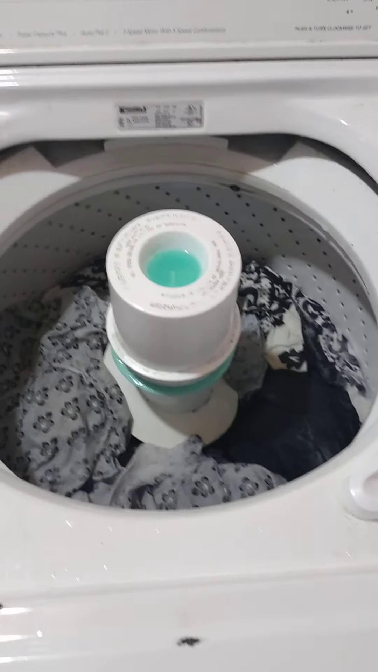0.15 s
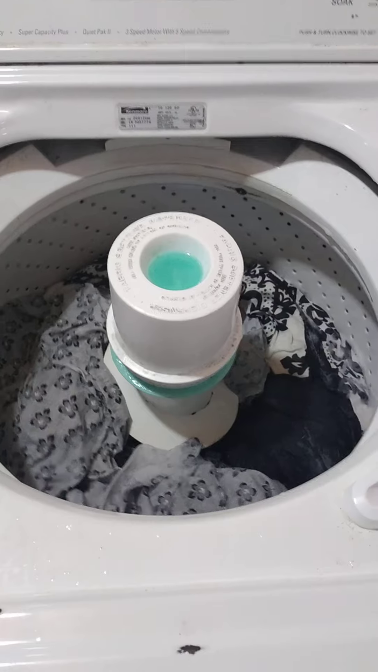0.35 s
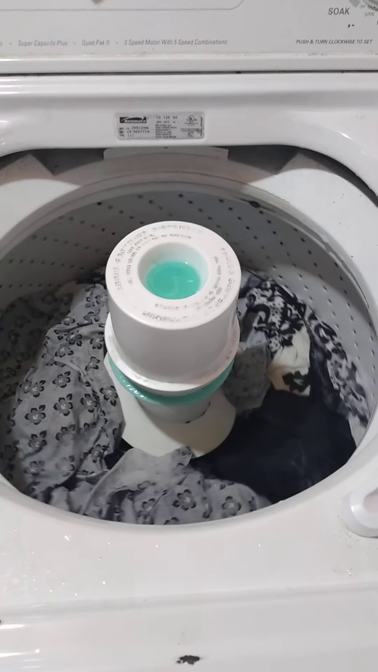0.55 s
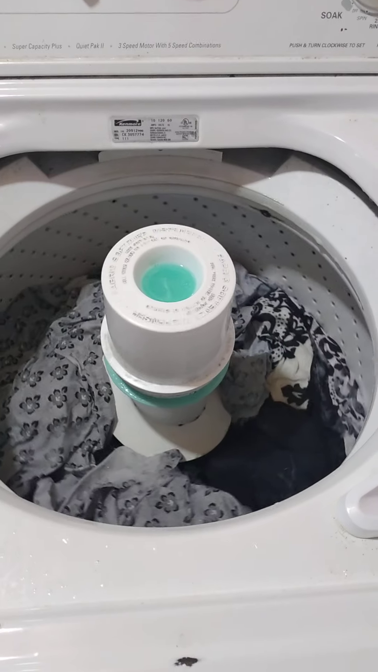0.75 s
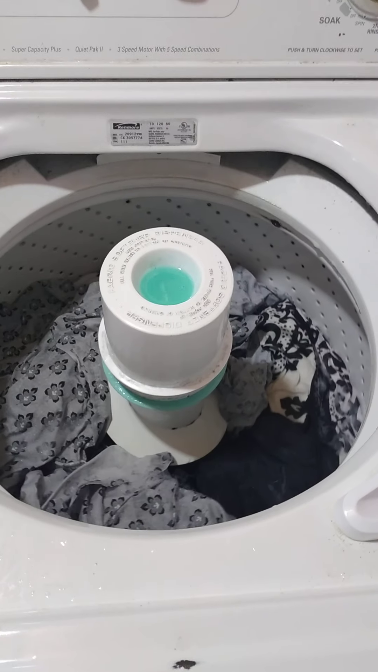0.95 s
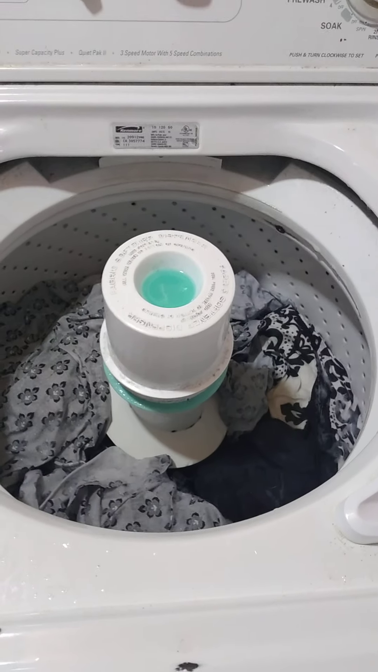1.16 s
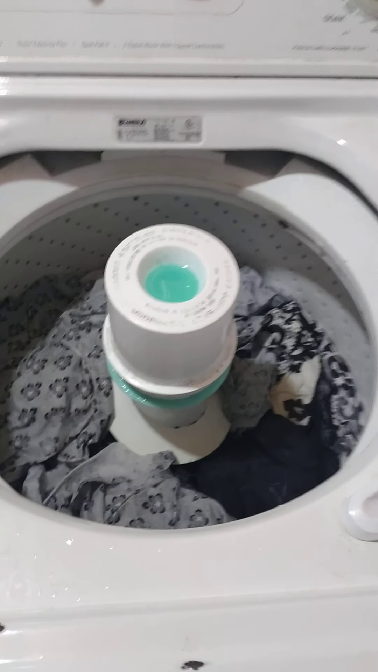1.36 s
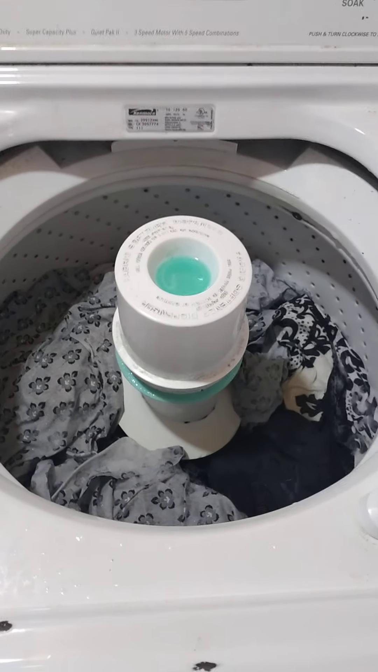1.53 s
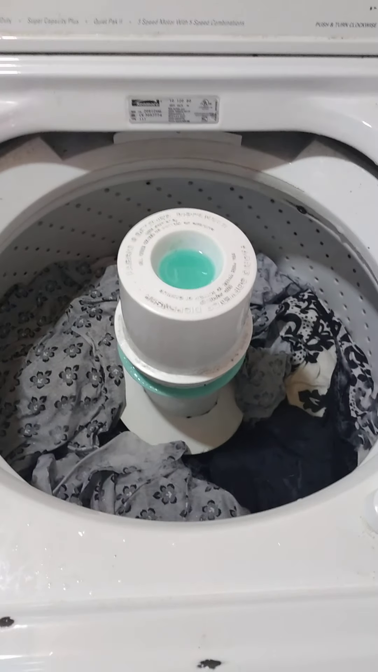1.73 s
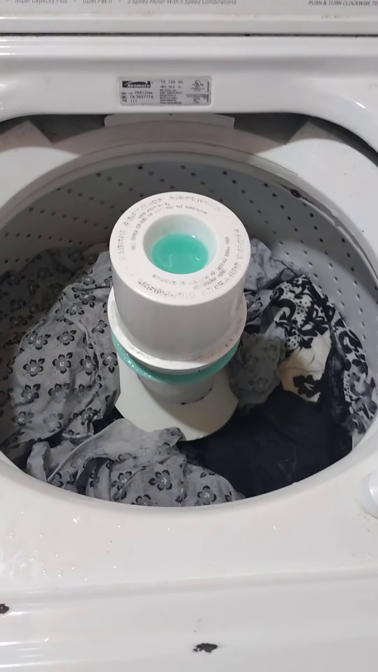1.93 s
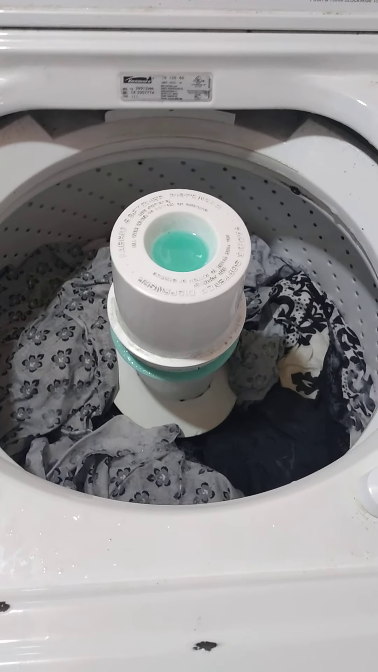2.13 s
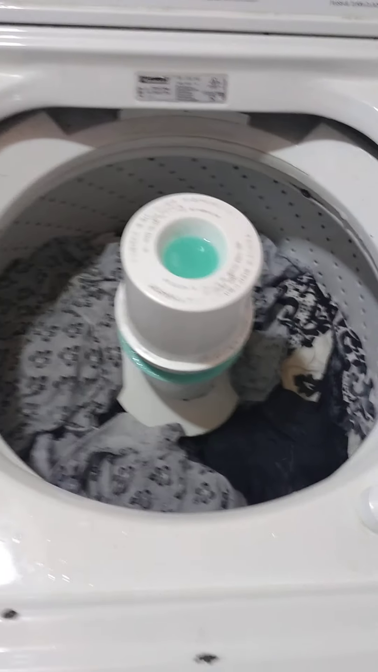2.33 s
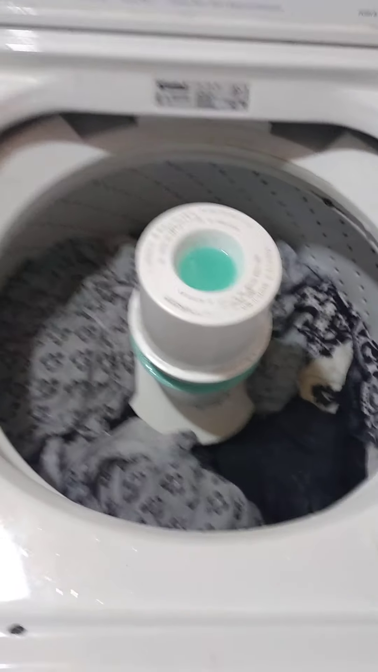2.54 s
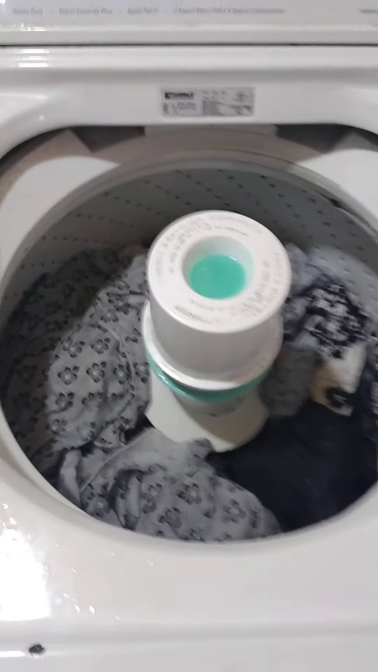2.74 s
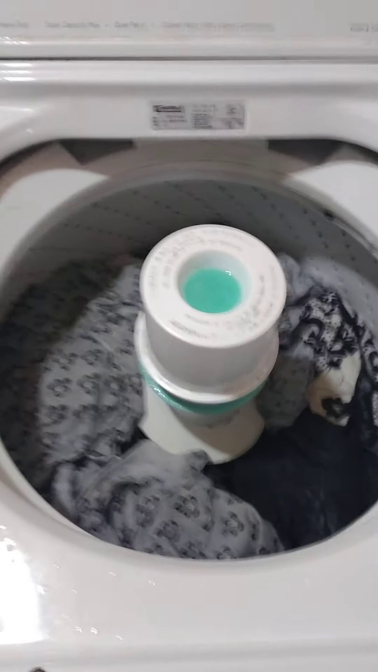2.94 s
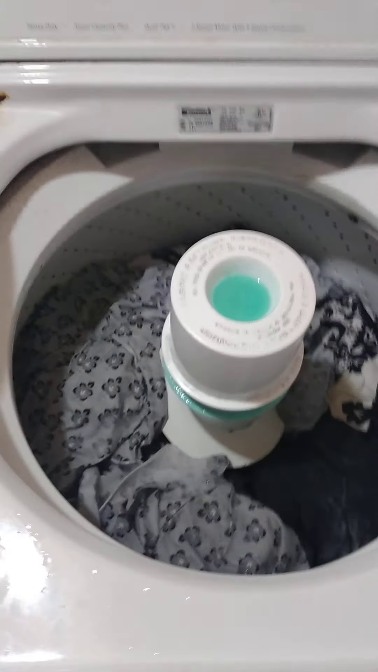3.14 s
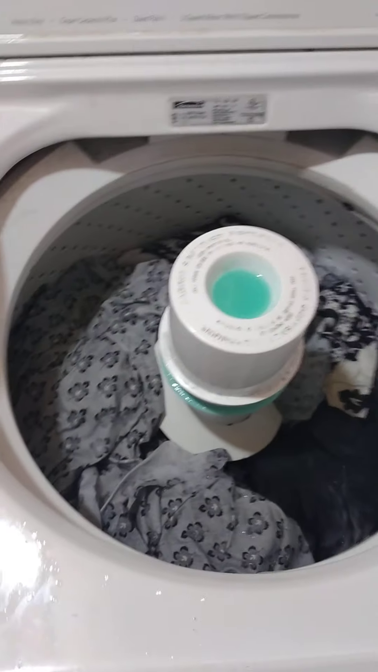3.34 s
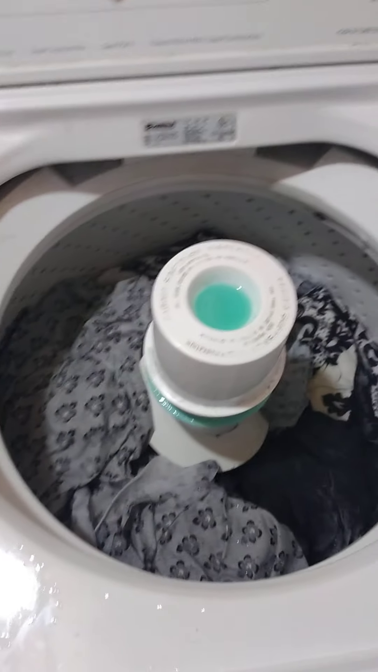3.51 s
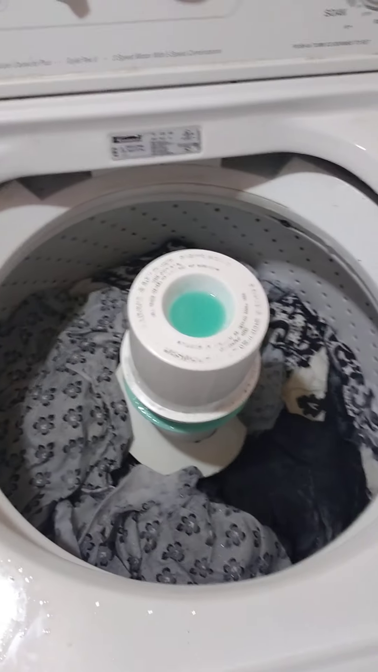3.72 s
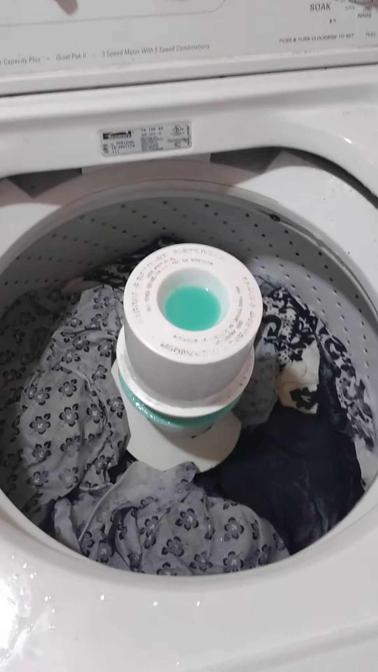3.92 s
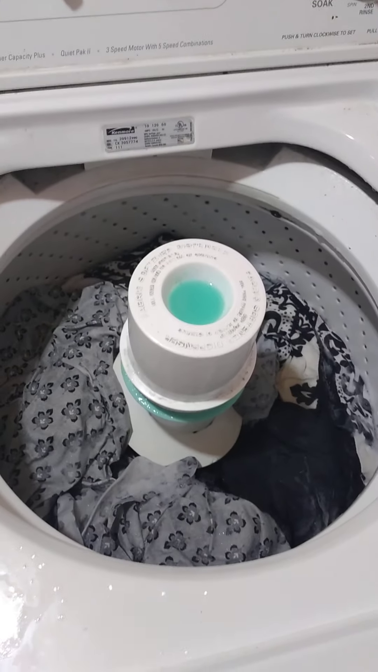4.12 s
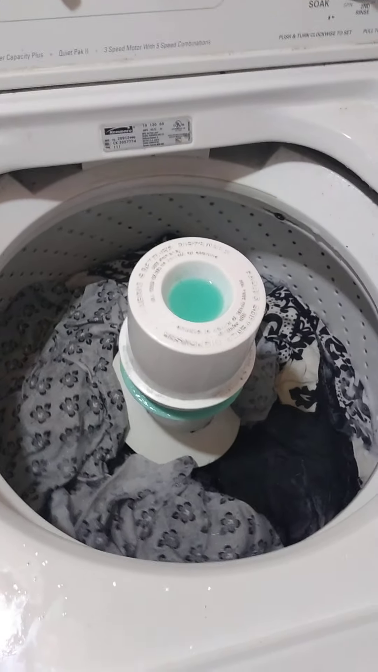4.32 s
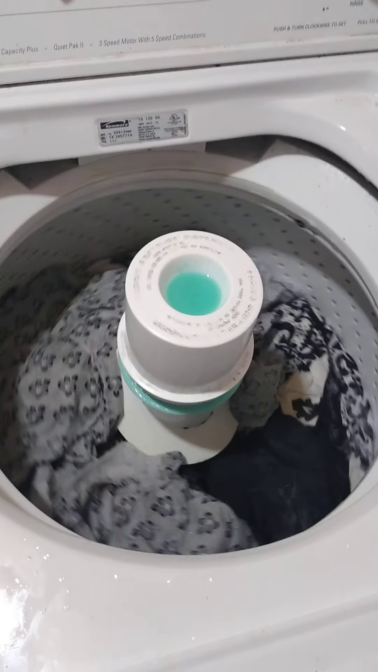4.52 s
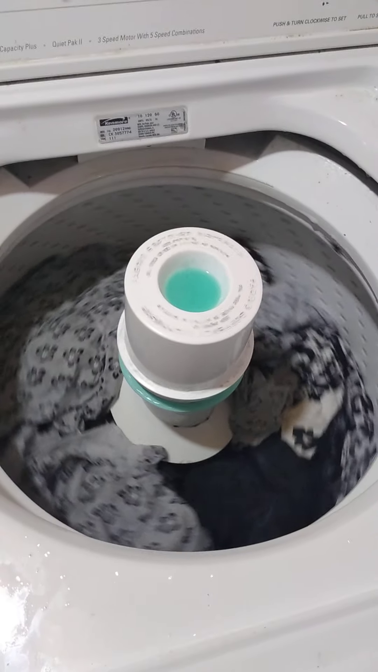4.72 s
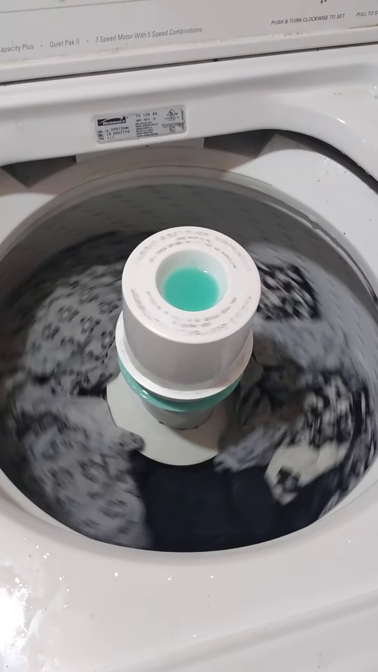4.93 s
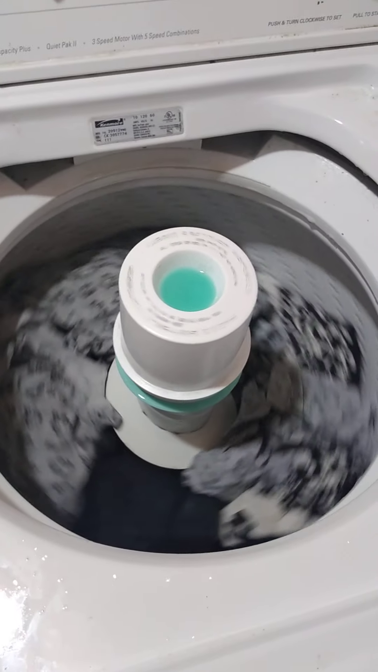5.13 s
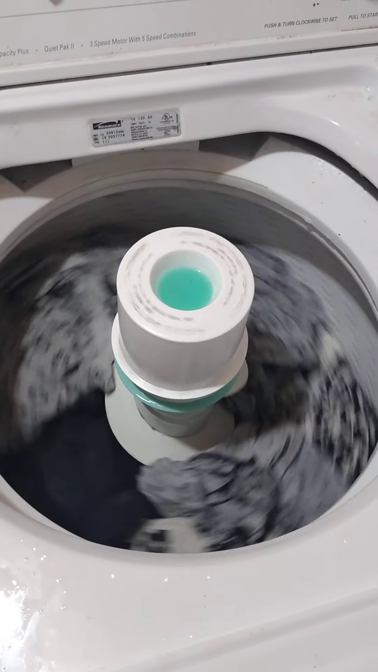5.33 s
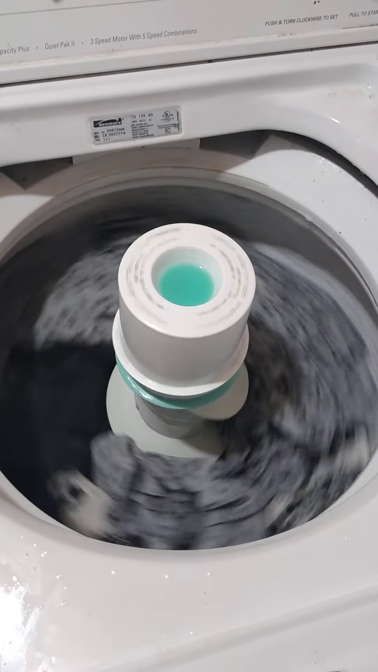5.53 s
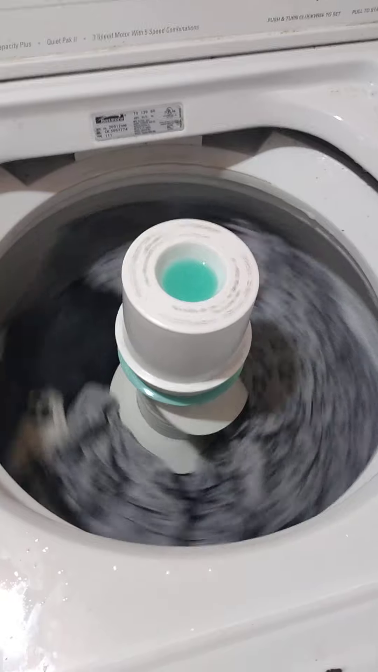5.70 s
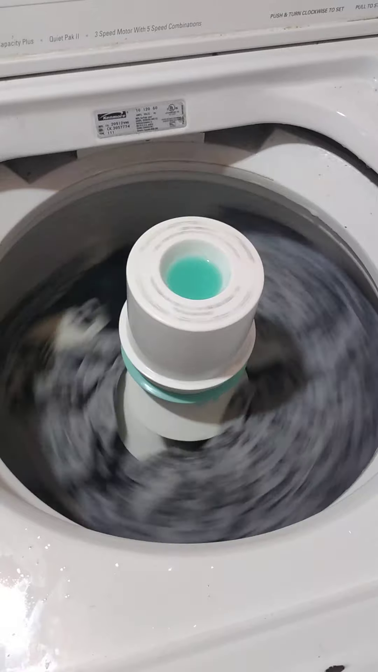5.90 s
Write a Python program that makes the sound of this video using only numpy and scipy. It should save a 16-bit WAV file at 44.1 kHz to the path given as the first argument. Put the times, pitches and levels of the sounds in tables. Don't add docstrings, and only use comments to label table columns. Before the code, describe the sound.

Loud brake clunk and smaller clack end a washer's hum, a soft fan throbs for several seconds, then the motor snaps on and spins.

```python
import sys
import numpy as np
from scipy import signal
from scipy.fft import rfft, irfft, next_fast_len
from scipy.io import wavfile
from scipy.ndimage import uniform_filter1d

SR = 44100
rng = np.random.default_rng(int(sys.argv[2]) if len(sys.argv) > 2 else 0)


def put_to_file(sound):
    columns = np.atleast_2d(sound).T
    safe = np.clip(columns, -1, 1)
    whole_steps = np.round(safe * 32767)
    wavfile.write(sys.argv[1], SR, whole_steps.astype(np.int16))


def amplitude_ratio(level_db):
    exponent = np.asarray(level_db, float) / 20
    return 10 ** exponent


N = 267378

# f/Hz, level per Hz/dB
BELT_COLOUR = [(2800, -4.5), (3500, -7), (4500, -7.5), (5500, -7.5), (6400, -10), (7200, -15),
               (8000, -10.5), (9000, -19), (10000, -21.5), (10800, -19.5), (11800, -25), (13000, -33),
               (14500, -40), (15600, -43)]
GEAR_COLOUR = [(30, 0), (45, -16), (70, -9.5), (105, -6), (190, -8.5), (270, -4), (400, -7.5), (600, -11),
               (870, -19.5), (1100, -15)]
COASTING_COLOUR = [(30, 5), (60, -11), (105, 11.5), (150, -27.5), (190, -7.5), (270, -11), (390, -5),
                   (520, -18), (650, -13), (870, -19.5), (1100, -18.5), (1700, -29), (2300, -31.5),
                   (3100, -44)]
GRIND_COLOUR = [(800, -5), (950, -1.5), (1200, 3.5), (1700, 0), (2300, -2), (2700, -10), (3100, -31)]
# f/Hz, width/Hz, level against the rumble/dB
TUB_MODES = [(722, 10, -10), (693, 9.7, -14.5), (1019, 63, -12), (1422, 13, -18.5), (1708, 22, -17),
             (515, 31, -14), (259, 22, -14.5), (2210, 28, -33), (2865, 19, -31), (694, 34, -15)]
COASTING_MODES = [(392, 13.5, -10.5), (242, 72, -8.5), (1720, 72, -17), (2230, 29, -26)]
# third shaft order/dB, fifth order/dB, gear rumble/dB, belt hiss/dB
COASTING_LEVELS = (-46, -40, -31.5, -62.5)
# t/s, level/dB
TORQUE = [
    (4.2, -55),
    (4.25, -33),
    (4.38, -42),
    (4.43, -30),
    (4.62, -26),
    (4.95, -30),
    (5.18, -28.5),
    (5.45, -26),
    (6.06, -26),
]
# t/s, half length/s, level/dB
SURGES = [(4.41, .04, -35.5), (4.54, 0.064, -33.5), (4.72, .05, -39), (4.815, 0.02, -34),
          (4.91, .04, -33.5), (5.08, 0.071, -40), (5.17, 0.045, -34.5), (5.27, 0.029, -27),
          (5.38, 0.037, -35), (5.475, 0.021, -33.5), (5.62, 0.087, -35.5), (5.73, 0.02, -51),
          (5.98, 0.052, -37.5)]

# start t/s, rise/s, rattling/s, t60/s
BRAKE_TIMING = (.2672, .003, .066, .13)
LATCH_TIMING = (.371, .003, .016, .15)
CONTACT_TIMING = (4.191, .002, .012, .07)
STARTER_TIMING = (4.317, .005, .018, .15)
# crash level/dB, share into the cabinet/dB, room tail/dB
BRAKE_LEVELS = (-16.5, -3.5, -11.5)
LATCH_LEVELS = (-31, -43, -11.5)
CONTACT_LEVELS = (-42.5, -12, 1)
STARTER_LEVELS = (-33, -39, -16.5)
# f/Hz, level per Hz/dB
BRAKE_COLOUR = [(60, -39), (130, -0.5), (220, -1), (400, -4.5), (700, -8), (1000, -4), (1400, -12.5),
                (2000, -17), (3000, -29), (4500, -39.5), (7500, -44.5), (9500, -53), (11500, -56.5),
                (15000, -82)]
LATCH_COLOUR = [(1200, 1.5), (2500, -8.5), (3600, -23), (4300, -19), (4900, -14), (5600, -22),
                (6400, -22.5), (7200, -17.5), (8300, -24.5), (9500, -26.5), (10700, -20.5), (12000, -41),
                (13500, -43), (15300, -62)]
CONTACT_COLOUR = [(500, -0.5), (1100, -12), (1600, -16), (2200, -6.5), (2700, -13), (3300, -36),
                  (4500, -35), (7000, -41), (10000, -48), (15000, -61)]
STARTER_COLOUR = [(900, -10.5), (1350, 0.5), (1800, -5), (2300, -5), (3000, -13.5), (3600, -14), (4400, -8),
                  (5200, -16.5), (6500, -20.5), (8000, -17.5), (9000, -21.5), (10500, -20.5), (12500, -34),
                  (15300, -44)]
# f/Hz, level/dB, t60/s
CABINET_MODES = [(98.5, -3, 0.43), (144, -12.5, 0.44), (215.2, -10, 0.41), (275.7, -17, 0.35),
                 (423, -18.5, 0.43), (491, -13.5, 0.69), (687, 4, 0.1), (838, -15.5, 0.1), (890, -3, 0.29),
                 (983, -18, 0.47), (1203, -24, 0.61), (1320, -28, 0.66), (1570, -15, 0.56),
                 (1820, -18, 0.35), (2770, -23, 0.4), (3074, -30.5, 0.24)]
# t/s, peak level/dB, signed push length/s
KNOCKS = [
    (.2688, -8, .0008),
    (.2726, -8.5, -.0009),
    (.3096, -12, -.001),
    (.3392, -11, .001),
]
# f/Hz, level per Hz/dB
BOOM_COLOUR = [(60, 0), (100, 4.5), (160, -2), (260, -12)]
# f/Hz, level/dB, t60/s
BRAKE_RINGS = [(392, -20, 0.11), (500, -23, 0.67), (673, -20, .12), (1145, -16, .3), (1650, -21, 0.12)]
CHATTER_RINGS = [(700, -22, 0.13), (915, -26, 0.48)]
LATCH_RINGS = [(1170, -32, .1), (1720, -34, .1), (2170, -40, .08), (4790, -43.5, 0.11), (7000, -42, .1),
               (10600, -46, .12)]
CONTACT_RINGS = [(620, -36, 0.065), (2370, -41, .05)]
# t/s, level/dB, swaying/s, t60/s
SWAYS = [
    (.26, -38.5, 0.23, 1),
    (4.27, -31.5, .03, .6),
]

# f/Hz, level per Hz/dB
FAN_COLOUR = [(22, 2), (38, 2), (55, -8.5), (90, -11.5), (140, -16.5), (213, -5.5), (315, -5), (476, -7.5),
              (560, -11), (830, -13.5), (1230, -21), (1980, -26), (2700, -38.5), (3300, -56.5)]
# f/Hz, width/Hz, level/dB
DUCT_MODES = [(216, 50, -14.5), (328.7, 18, -14), (486, 22, -15.5), (819, 13, -13)]
# t/s, treble level/dB
FAN_FACING = [
    (0, -1),
    (2.5, -1.5),
    (3.1, 0),
    (4.2, 2.5),
]
# f/Hz, level per Hz/dB
LEAK_COLOUR = [(2600, 0), (3300, -8), (4500, -13), (5200, -22), (9000, -25)]
# t/s, peak level/dB, f/Hz
CREAKS = [
    (2.1181, -79, 5970),
    (2.2019, -75, 5960),
    (2.7816, -76, 4500),
    (4.0248, -81, 4960),
]
# open t/s, shut t/s
GATE = [
    (-.1, .205),
    (.26, .527),
    (4.19, 6.2),
]

# f/Hz, left minus right/dB
MOTOR_SIDE = [(60, -13), (140, -27), (320, -11), (600, -10.5), (1100, 13), (1800, 5.5), (3000, -3.5),
              (5000, 1.5), (7500, -1), (10500, 1), (14000, -1)]
MOTOR_PAN = [(60, 2), (140, -2), (320, 2.5), (600, -2), (1100, 4.5), (1800, 4.5), (3000, -0.5), (5000, 1.5),
             (7500, 13.5), (10500, -13.5), (14000, -24)]
BLOW_SIDE = [(60, -29), (140, -27), (320, -16), (600, -7), (1100, 5.5), (1800, 7.5), (3000, 1), (5000, -1),
             (7500, 0.5), (10500, 0), (14000, 0)]
BLOW_PAN = [(60, -2.5), (140, 0.5), (320, 3), (600, 2), (1100, 6.5), (1800, 0.5), (3000, 0.5), (5000, 1.8),
            (7500, 13.5), (10500, -12), (14000, -22)]
FAN_SIDE = [(60, -14), (91, -15.5), (140, -20), (210, -15.5), (320, -10.5), (490, -9), (740, -2.5),
            (1130, 2.5), (1710, 2.5), (2600, 3)]
FAN_PAN = [(60, -0.5), (91, -5), (140, 2.5), (210, 1), (320, 2.5), (490, 1.5), (740, 3.5), (1130, 5.5),
           (1710, 2), (2600, 0)]

CUT_S, STOP_S = .2, .265
POWER_S, SPEED_S = 4.2, 4.38
THROB_HZ = 9.96


def seconds(size=N):
    return np.arange(size) / SR


def ramp(start, rise):
    return np.clip((seconds() - start) / rise, 0, 1)


def over_time(rows):
    return np.interp(seconds(), *np.transpose(rows))


def on_hz(table, hz):
    points = np.array(table)
    return np.interp(np.log(hz + 1), np.log(points[:, 0]), points[:, 1])


def unit(x):
    return x / np.sqrt(np.mean(x ** 2))


def walk(rate):
    k = int(SR / rate)
    steps = np.repeat(rng.standard_normal(N // k + 1), k)
    return 0.92 * uniform_filter1d(uniform_filter1d(steps, k), k)[:N]


def noise(colour, side, pan, flicker_db=0., rate=12, throb_db=0., throb_hz=1e5, size=N):
    n = next_fast_len(size)
    hz = np.arange(n // 2 + 1) * SR / n
    mid, other = rfft(rng.standard_normal((2, n)))
    other = other * amplitude_ratio(np.minimum(on_hz(side, hz), 0))
    lean = amplitude_ratio(on_hz(pan, hz) / 2)
    inside = (hz > .7 * colour[0][0]) * (hz < 1.03 * colour[-1][0])
    gain = amplitude_ratio(on_hz(colour, hz)) * inside
    both = gain * np.array([(mid + other) * lean, (mid - other) / lean])
    if flicker_db == 0:
        return unit(irfft(both, n)[:, :size])
    out = 0
    for centre in 25 * 4. ** np.arange(6):
        share = np.clip(1 - np.abs(np.log(hz / centre + 1e-9) / np.log(4)), 0, 1)
        level_db = flicker_db * walk(rate) + throb_db * min(centre / throb_hz, 1)
        out = out + irfft(both * share, n)[:, :size] * amplitude_ratio(level_db)
    return unit(out)


def ring(x, hz, t60):
    pole = np.exp(2j * np.pi * hz / SR - np.log(1000) / (t60 * SR))
    return signal.lfilter([1], [1, -pole], x).imag


def resonate(shake, modes):
    return sum(amplitude_ratio(db) * unit(ring(shake, hz, np.log(1000) / np.pi / width)) for hz, width, db in modes)


def shaken(modes, size):
    return resonate(noise([(20, 0), (4000, 0)], MOTOR_SIDE, MOTOR_PAN, size=size), modes)


def motor(levels, shaft_hz, rumble, belt):
    on, third_db, fifth_db, rumble_db, belt_db = levels
    turn = 2 * np.pi * shaft_hz * seconds() + 0.028 * walk(4.4)
    low = np.sin(3 * turn) + amplitude_ratio(-26) * np.sin(turn)
    low = low + amplitude_ratio(-22 + 1.5 * walk(17)) * np.sin(2 * turn)
    low = low + amplitude_ratio(-15.5 + 2.5 * walk(3.74)) * np.sin(2 * np.pi * 119 * seconds())
    hum = amplitude_ratio(third_db + 1.4 * walk(15)) * low
    hum = hum + amplitude_ratio(fifth_db + 4.1 * walk(15)) * np.sin(5 * turn)
    hum = np.sqrt(2) * hum * amplitude_ratio(np.array([[-.8], [.8]]))
    return on * (hum + amplitude_ratio(rumble_db) * rumble + amplitude_ratio(belt_db) * belt)


def spinning():
    t = seconds()
    start_db = -15 * (1 - ramp(POWER_S, .034))
    jolt_db = 4 * np.exp(-((t - 4.245) / .034) ** 2)
    clutch_s = 4.577
    slip = 1 - ramp(clutch_s, .13)
    fifth_db = -35 + start_db + jolt_db - 4 * slip
    belt_db = -54.5 - 6 * slip + 1.04 * np.maximum(t - clutch_s, 0)
    return ramp(POWER_S, .011), over_time(TORQUE), fifth_db, -35 + start_db, belt_db


def coasting():
    fade_db_per_s, length = -130, STOP_S - CUT_S
    fade = fade_db_per_s * length * ramp(CUT_S, length)
    return [1 - ramp(STOP_S, .01)] + [db + fade for db in COASTING_LEVELS]


def gears():
    out = noise(GEAR_COLOUR, MOTOR_SIDE, MOTOR_PAN, flicker_db=4.5)
    a = int(SPEED_S * SR)
    out[:, a:] += shaken(TUB_MODES, N - a)
    return out


def drone():
    t = seconds()
    surge = amplitude_ratio(-56) * ramp(SPEED_S, .02)
    surge = surge + sum(amplitude_ratio(db) * np.exp(-((t - s) / half) ** 2) for s, half, db in SURGES)
    phase = 2 * np.pi * 329.8 * t + .8 * walk(30) + 0.57 * np.array([walk(7.7), walk(11)])
    return surge * np.sqrt(2) * amplitude_ratio(2.2 * walk(25.04)) * np.sin(phase)


def blow(timing, levels_db, colour):
    start, rise, hold, t60 = timing
    db, panels_db, room_db = levels_db
    a, size, room_t60 = int(start * SR), SR // 2, .5
    t = seconds(size)
    push = np.clip(t / rise, 0, 1) * amplitude_ratio(1.2 * walk(200)[:size])
    crash = noise(colour, BLOW_SIDE, BLOW_PAN, size=size)
    after = np.maximum(t - rise - hold, 0)
    tail = 1000. ** (-after / t60) + amplitude_ratio(room_db) * 1000. ** (-after / room_t60)
    drive = crash * push * (t < rise + hold) * np.exp(-t / hold)
    panels = sum(amplitude_ratio(g) * ring(drive, hz, d) / np.sqrt(hz) for hz, g, d in CABINET_MODES)
    panels = panels / np.sqrt(np.mean(panels[:, :size // 5] ** 2))
    out = np.zeros((2, N))
    out[:, a:a + size] = amplitude_ratio(db) * (crash * push * tail + amplitude_ratio(panels_db) * panels)
    return out


def knocks():
    t = seconds()
    hits = 0
    for s, db, push in KNOCKS:
        v = np.clip((t - s) / push, -9, 9)
        hits = hits + amplitude_ratio(db) * np.sin(-np.pi * v) * np.exp(-v ** 2)
    after = t - KNOCKS[0][0]
    boom = amplitude_ratio(-34) * (after > 0) * 1000. ** (-np.abs(after) / 1.76)
    return hits * amplitude_ratio(np.array([[1.5], [-1.5]])) + boom * noise(BOOM_COLOUR, BLOW_SIDE, BLOW_PAN)


def rings():
    out, size = np.zeros((2, N)), SR // 2
    strikes = ((BRAKE_TIMING[0], BRAKE_RINGS), (.31, CHATTER_RINGS),
               (LATCH_TIMING[0], LATCH_RINGS), (CONTACT_TIMING[0], CONTACT_RINGS))
    for start, parts in strikes:
        a = int(start * SR)
        for hz, db, t60 in parts:
            rattle = rng.standard_normal((2, size)) * np.exp(-seconds(size) / .0061)
            stereo = rattle[0] + .6 * rattle[1] * np.array([[1], [-1]])
            sound = ring(stereo, hz, t60)
            out[:, a:a + size] += amplitude_ratio(db) * sound / np.abs(sound).max()
    return out


def rocking():
    t = seconds()
    sway = noise([(20, -17.0), (35, 9.0), (75, -10.5)], BLOW_SIDE, BLOW_PAN)
    level = 0
    for s, db, hold, t60 in SWAYS:
        level = level + amplitude_ratio(db) * ramp(s, .02) * 1000. ** (-np.maximum(t - s - hold, 0) / t60)
    return sway * level


def fan():
    throb = 3.6 * np.sin(2 * np.pi * (THROB_HZ * seconds() + 0.033 * walk(0.98)))
    air = noise(FAN_COLOUR, FAN_SIDE, FAN_PAN, flicker_db=2.17, rate=5.53,
                throb_db=throb + over_time(FAN_FACING), throb_hz=2530.0)
    shake = noise([(20, 0), (4000, 0)], FAN_SIDE, FAN_PAN)
    return amplitude_ratio(-46 + fan_swell()) * (air + resonate(shake, DUCT_MODES))


def fan_swell():
    t = seconds()
    peak_s = .54
    wake = 6 * np.minimum(t / peak_s, np.exp((peak_s - t) / .18))
    return 2.06 + wake - 11.5 * np.maximum(t - POWER_S, 0)


def leak():
    t = seconds()
    crest = np.maximum(np.sin(2 * np.pi * (THROB_HZ * t + .1)), 0) ** 2
    creaks = 0
    for s, db, hz in CREAKS:
        creaks = creaks + amplitude_ratio(db) * np.exp(-((t - s) / .0006) ** 2) * np.sin(2 * np.pi * hz * (t - s))
    level = amplitude_ratio(-92 + 6 * crest * (2 + .25 * walk(4)))
    return level * noise(LEAK_COLOUR, FAN_SIDE, FAN_PAN) + creaks


def scene():
    belt = noise(BELT_COLOUR, MOTOR_SIDE, MOTOR_PAN)
    loaded_belt = belt + amplitude_ratio(12.5) * noise(GRIND_COLOUR, MOTOR_SIDE, MOTOR_PAN)
    idle = noise(COASTING_COLOUR, BLOW_SIDE, BLOW_PAN) * amplitude_ratio(0.93 * walk(36.0))
    idle = idle + shaken(COASTING_MODES, N)
    running_down = motor(coasting(), 29.2, idle, belt)
    starting = motor(spinning(), 28.74, gears(), loaded_belt)
    blows = blow(BRAKE_TIMING, BRAKE_LEVELS, BRAKE_COLOUR) + knocks()
    blows = blows + blow(LATCH_TIMING, LATCH_LEVELS, LATCH_COLOUR)
    blows = blows + blow(CONTACT_TIMING, CONTACT_LEVELS, CONTACT_COLOUR)
    blows = blows + blow(STARTER_TIMING, STARTER_LEVELS, STARTER_COLOUR)
    return running_down + starting + drone() + blows + rings() + rocking() + fan()


def roll_off(x):
    return signal.sosfilt(signal.butter(12, 15750, fs=SR, output="sos"), x)


def record(dry):
    t = seconds()
    gate = uniform_filter1d(sum(1. * (t > a) * (t < b) for a, b in GATE), 300)
    high_pass = signal.butter(6, 3300, "high", fs=SR, output="sos")
    treble = signal.sosfiltfilt(high_pass, dry)
    hiss = amplitude_ratio(-91) * rng.standard_normal((2, N))
    mix = dry - (1 - gate) * treble + hiss + leak()
    return roll_off(mix)


dry = scene()
out = record(dry)
put_to_file(out)
```